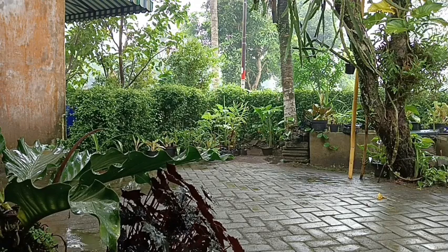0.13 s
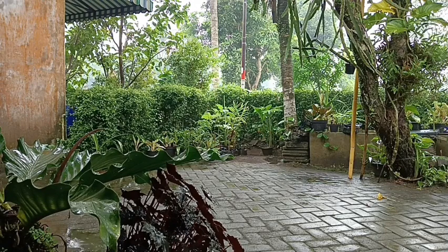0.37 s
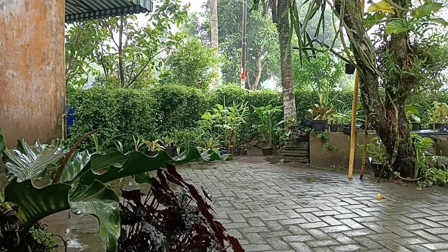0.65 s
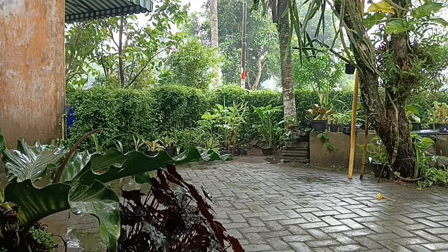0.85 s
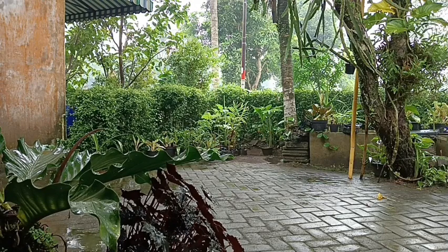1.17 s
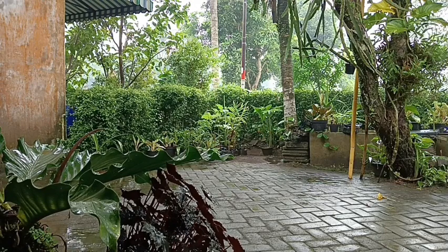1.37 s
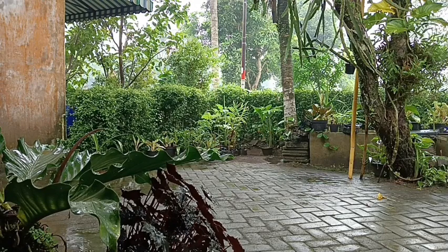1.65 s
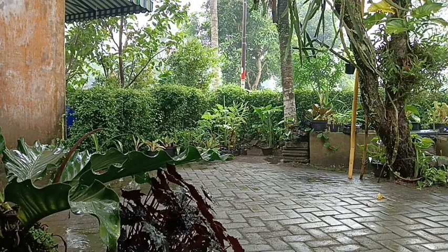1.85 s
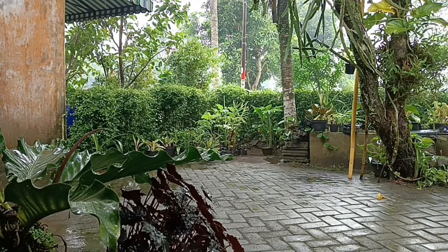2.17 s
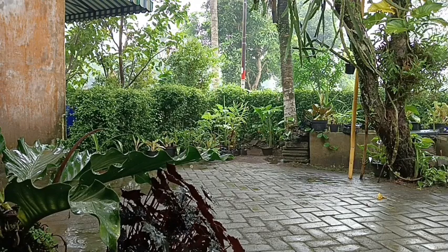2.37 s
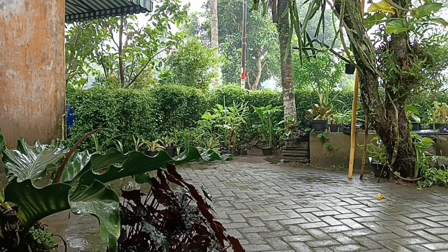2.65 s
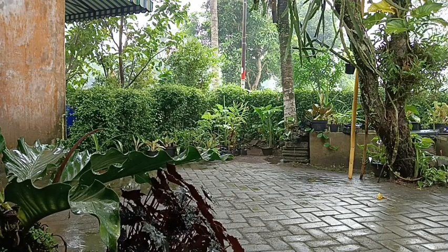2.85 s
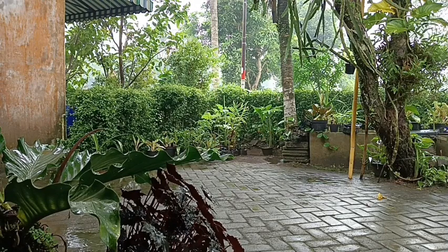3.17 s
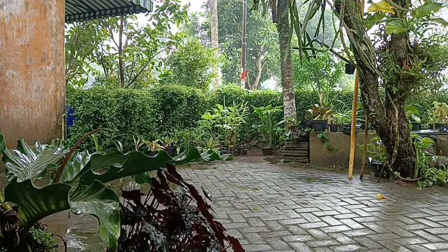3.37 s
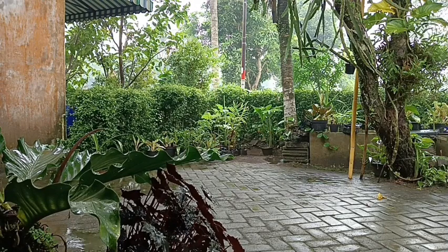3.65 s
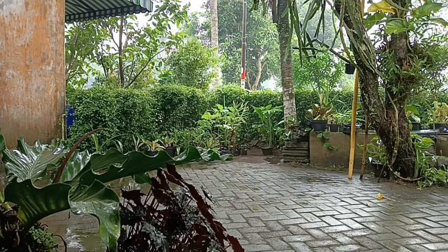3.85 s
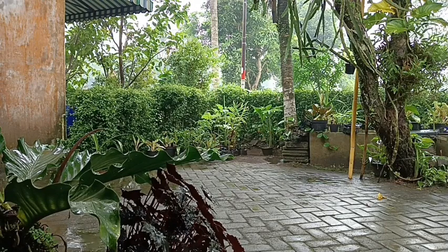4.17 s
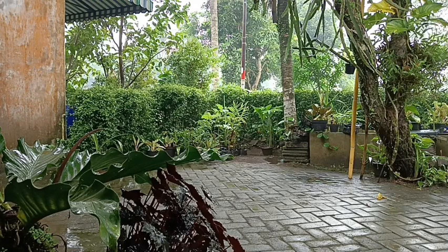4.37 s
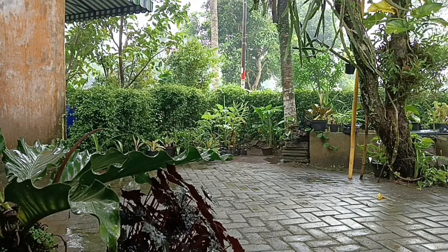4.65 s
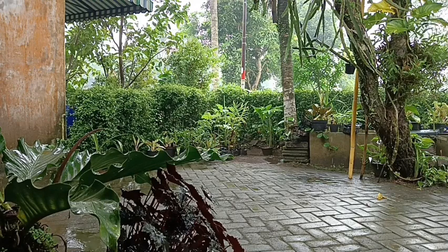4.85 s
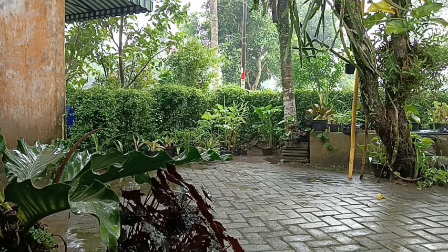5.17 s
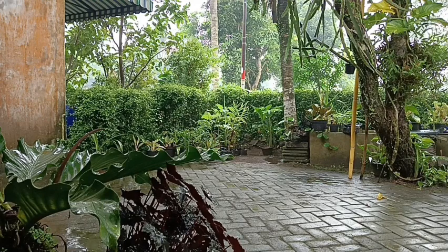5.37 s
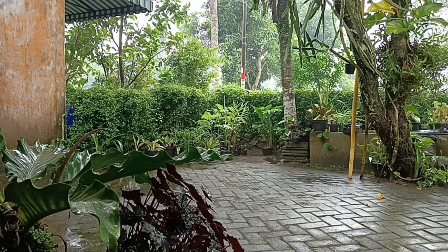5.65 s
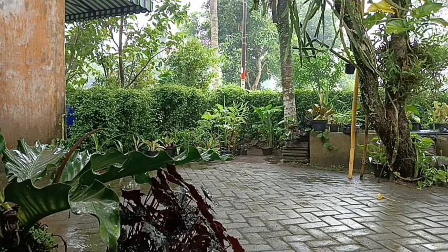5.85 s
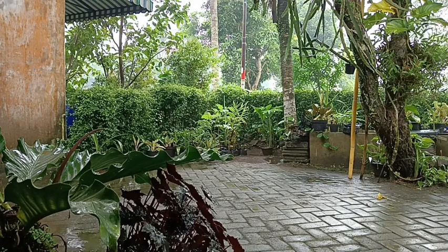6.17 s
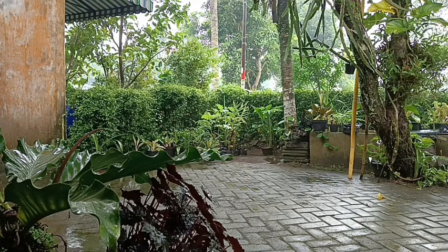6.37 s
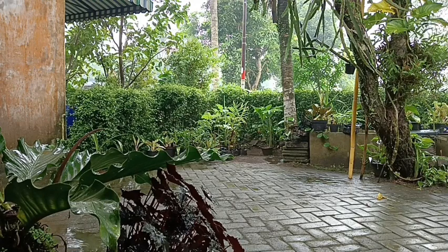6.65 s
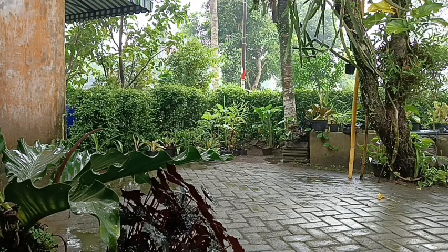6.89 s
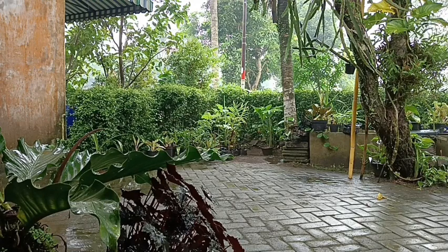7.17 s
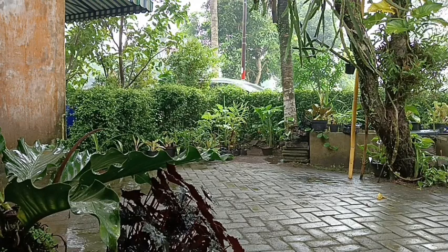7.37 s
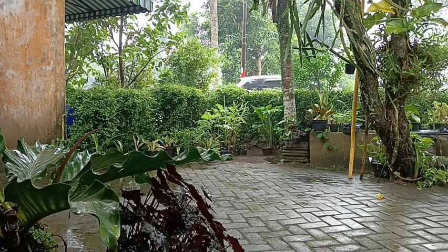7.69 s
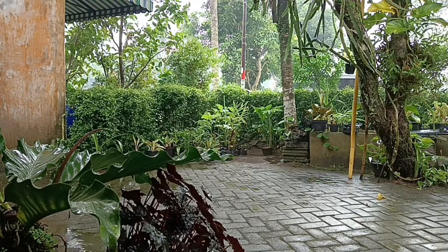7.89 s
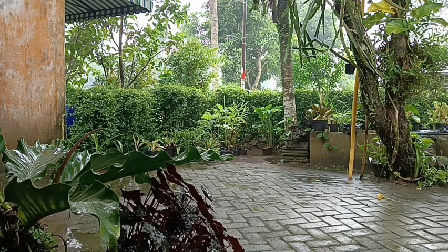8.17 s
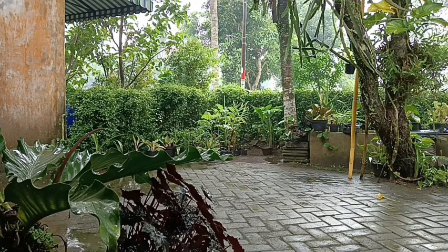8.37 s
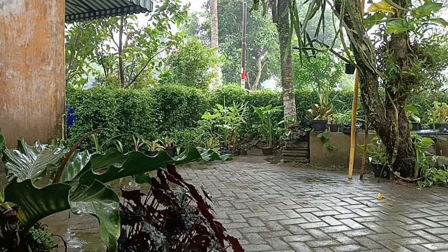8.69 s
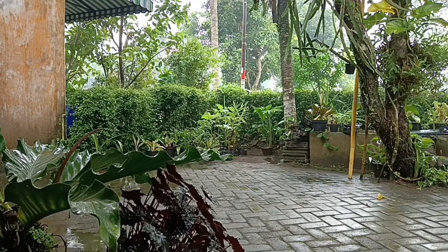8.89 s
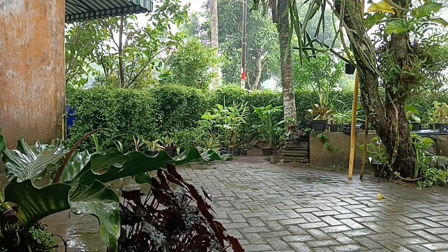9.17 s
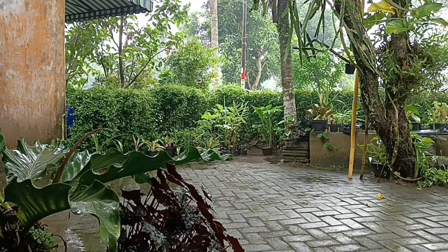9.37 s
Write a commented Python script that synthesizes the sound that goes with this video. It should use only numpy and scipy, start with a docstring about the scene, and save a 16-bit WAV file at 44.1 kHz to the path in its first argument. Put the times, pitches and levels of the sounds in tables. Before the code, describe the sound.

Steady soft rain with hoarse and gliding bird calls; later a car swells up behind a hedge, wet tyres hissing, then growing duller.

```python
"""Light rain on a leafy garden, heard from under a porch roof, is filtered noise with random ticks throughout.
Birds call from the wet trees from the start: hoarse, then also whistled, gliding tones with blurred pitch. Soon
drops shaken from a branch burst on the leaves as fading bright noise, and from 1.5 s heavy drips thud. From
about 4 s a car comes out of faint distant traffic on the wet road behind the hedge. It is made of noise bands
and two blurred engine notes, and its tyre hiss peaks near 8 s, then grows duller."""
import sys
import numpy as np
from scipy import signal
from scipy.fft import rfft, irfft, next_fast_len
from scipy.io import wavfile
from scipy.ndimage import uniform_filter1d, map_coordinates

SR = 44100
rng = np.random.default_rng(int(sys.argv[2]) if len(sys.argv) > 2 else 0)


def bounce(signal):
    """Save signal as a 16-bit WAV file at the path given by the first command-line argument."""
    frames = np.transpose(np.atleast_2d(signal))
    limited = np.clip(frames, -1, 1)
    pcm = np.round(limited * 32767).astype(np.int16)
    wavfile.write(sys.argv[1], SR, pcm)


N = 420273  # length of the scene in samples

# How hard it rains. Each row: time in seconds, level in dB before the quick flurries.
RAIN_LEVEL = [(0, -46.5), (1.7, -48), (2.7, -49.5), (3.1, -46), (5.9, -47.5), (9.53, -52)]
# Tone colour of rain, also the base for the splashes. Each row: frequency in Hz, strength in dB per Hz.
RAIN_SPECTRUM = [(180, -16), (300, -9), (700, -7.5), (1150, -18), (1350, -2), (1910, 2.5), (3070, 3),
                 (4350, -8.5), (5300, 1.5), (8700, -8), (11700, 2.5), (15500, -11)]
# How alike the two ears' noise is. Each row: frequency in Hz, likeness from 0 to 1 (some sounds set a minimum).
EAR_LIKENESS = [(60, 1), (200, 0.91), (330, 0.86), (520, 0.014)]

# Hoarse calls, one row per strand. Each row: start in seconds, swell in seconds, hold in seconds, first pitch
# in Hz, settled pitch in Hz, peak level in dB before rasp and flutter, blur in Hz (of the first partial).
HOARSE_CALLS = [ (0, 0.00035, 0.0038, 3410, 3350, -30.5, 1803), (.125, 0.027, 0.17, 4010, 3534, -44.5, 400),
                (.142, .02, 0.079, 4540, 4310, -44, 810), (.172, 0.017, 0.056, 2715, 2986, -41.5, 506),
                (.195, 0.014, 0.03, 1430, 1463, -54.5, 302), (.333, 0.02, 0.094, 2620, 2544, -45, 401),
                (.44, 0.0081, 0.039, 2785, 2500, -40, 607), (.34, 0.04, 0.12, 4374, 3990, -39.5, 3010),
                (.68, 0.0067, 0.12, 2102, 2030, -43.5, 449), (.69, 0.01, 0.042, 3980, 3720, -47.5, 467),
                (.77, 0.008, 0.022, 1610, 1573, -52.5, 150), (1.05, 0.01, 0.068, 2566, 2646, -48.5, 688),
                (1.1, 0.0063, 0.038, 3360, 3300, -47, 452), (1.172, .026, .003, 3880, 2860, -37.5, 250),
                (1.2, 0.025, 0.052, 3046, 3267, -31.5, 563), (2.18, 0.04, 0.018, 5190, 6030, -47.5, 2000),
                (3.222, 0.01, 0.074, 5040, 4130, -43, 2170), (3.205, 0.0082, 0.052, 2550, 2444, -39, 182),
                (3.232, 0.035, 0.073, 2320, 2128, -31, 149), (5.252, 0.039, 0.02, 3104, 3310, -30.5, 300),
                (3.31, 0.018, 0.056, 1988, 1540, -47.5, 301), (4.86, 0.048, 0.035, 4190, 3555, -38.5, 448),
                (5.155, 0.0056, 0.014, 2950, 2750, -34, 1103), (5.14, 0.058, 0.032, 3336, 3900, -32, 500),
                (5.246, .004, 0.046, 3780, 3677, -30.5, 547), (5.21, 0.023, 0.027, 4160, 4400, -39, 400),
                (5.49, 0.041, 0.13, 2580, 2788, -34.5, 790), (6.612, 0.027, 0.22, 3128, 3450, -38.5, 1503),
                (6.69, 0.039, 0.12, 3730, 4420, -40.5, 650)]
# How every hoarse strand moves. In order: swell in dB, fade in dB per second, glide time in seconds.
HOARSE_MOTION = (4.2, 350, .04)
# Clear whistled notes. Each row: start in seconds, swell in seconds, hold in seconds, first pitch in Hz,
# settled pitch in Hz, peak level in dB before flutter, blur in Hz (of the first partial).
WHISTLED_NOTES = [ (.76, 0.027, 0.038, 2540, 2580, -45.5, 243), (1.203, 0.005, 0.094, 2740, 2717, -44, 229),
                  (2.46, 0.0085, 0.013, 2670, 2605, -47, 493),
                  (2.895, 0.031, 0.057, 3705, 4010, -34.5, 171),
                  (2.96, 0.022, 0.13, 4256, 4187, -32.5, 298.5),
                  (3.125, 0.028, 0.057, 4160, 4084, -34, 171), (4.4, 0.11, 0.056, 3380, 3541, -23.5, 197),
                  (4.92, 0.072, 0.073, 3503, 3540, -29, 204.6), (5.57, 0.044, 0.024, 2840, 2860, -39, 295),
                  (6.275, 0.011, 0.048, 2155, 2157, -47.5, 198)]
# How every whistle moves. In order: swell in dB, fade in dB per second, glide time in seconds.
WHISTLE_MOTION = (15.7, 250, 0.046)
WHISTLE_OVERTONES_DB, HOARSE_OVERTONES_DB = (-26.5, -16.5), (-18.5,)  # relative to the first partial
FADE_END_DB = 35  # a note stops once it has faded this far

# Drops shaken from a branch. Each row: start in seconds, peak level in dB (the average starts 9.5 dB
# lower), time in seconds to fade by 60 dB.
LEAF_SPLASHES = [(0.3262, -31, 0.3), (1.0914, -35, 0.76), (5.1557, -31, 0.88), (6.12, -34, .3)]
# Heavy drips nearby. Each row: start in seconds, level in dB, centre in Hz, time in seconds to fall to
# half strength, splatter from 0 to 1.
HEAVY_DRIPS = [(1.553, -54.5, 765, 0.04, 0.2), (1.804, -53, 613, 0.04, 0.5),
               (2.126, -54.5, 736, 0.12, 0.25), (2.178, -58, 463, .11, 0.05),
               (5.248, -48.5, 670, 0.035, 0.9), (5.25, -55, 270, 0.056, 0), (5.401, -45, 630, 0.041, 0.33),
               (5.815, -54.5, 736, 0.055, 0), (6.132, -56, 810, 0.096, 0.07),
               (7.124, -39, 1122, 0.029, 0.12)]

# The car. Each row: time in seconds, nearness as tyre hiss in dB before lingering and wavering, engine load
# as drone in dB before the throb, engine note in Hz, note level in dB before the throb.
CAR_PATH = [(0, -76.5, -77, 161.6, -90), (4.2, -54.5, -77.5, 161.5, -78.5), (5, -45, -70.5, 159, -66),
            (5.7, -44.5, -77, 159, -61.5), (6.08, -45, -73, 162, -71.5), (6.22, -43.5, -59, 163, -57),
            (6.9, -37, -52, 167.2, -47.5), (7.3, -33, -49, 170.9, -52), (7.8, -32, -51.5, 172.7, -55),
            (8.2, -32.5, -46.5, 191.1, -55), (8.8, -33, -41.5, 212, -47.5),
            (9.53, -35.5, -43, 232.2, -53.5)]
# Low boom of the car. Each row: frequency in Hz, strength in dB per Hz.
BOOM_SPECTRUM = [(50, -45), (72, -9.5), (95, -9), (130, -19.5), (200, -67)]
# Engine drone. Each row: frequency in Hz, strength in dB per Hz.
DRONE_SPECTRUM = [(90, -36), (130, -3.5), (320, -4), (390, -15), (600, -72)]
# Road roar. Each row: frequency in Hz, strength in dB per Hz.
ROAR_SPECTRUM = [(300, -79), (430, 6), (1100, 6.5), (2000, -68)]
# Tyres drawing near, brighter. Each row: frequency in Hz, strength in dB per Hz.
COMING_SPECTRUM = [(650, -103), (1100, -8), (2410, 5), (5360, -5), (8160, -23), (11800, -11.5),
                   (15500, -36)]
# Tyres moving off, duller. Each row: frequency in Hz, strength in dB per Hz.
GOING_SPECTRUM = [(650, -20), (1100, -4.5), (2090, 2.5), (6320, -14.5), (8160, -30), (11100, -13),
                  (15500, -27)]
FAR_BOOM_DB, FAR_DRONE_DB, FAR_ROAR_DB = -76, -91, -73  # distant traffic under it all
BOOM_DB, BOOM_GROWS, SPRAY_DB = -15, 1.054, -7  # boom and fine spray follow nearness
ROAR_DB, ROAR_GROWS = 30, 1.66  # roar follows engine load
# A second engine note joins as the pitch rises: it is weaker by this slope below this pitch of the first.
UPPER_RATIO, UPPER_FROM_HZ, UPPER_DB_PER_HZ = 1.45, 212, 1
NOTE_BLUR_HZ, LINGER_DB = 29.94, 3  # the hiss lingers behind the car
LEFT_LEAD_S = 0.000472  # roar and hiss reach the left this much earlier once the car has passed

# Balance of the two microphones. Each row: frequency in Hz, left over right in dB.
LEFT_OVER_RIGHT = [(5000, 0), (8000, -2), (10500, 9.5), (15000, 2)]
TOP_HZ = 15600  # nothing is heard from here up


def amp(db):
    """Turn decibels into a plain multiplier."""
    return 10 ** (np.asarray(db) / 20)


def unit(x):
    """Scale to an average strength (rms) of 1."""
    return x / np.sqrt(np.mean(np.abs(x) ** 2) + 1e-20)


def along(points, hz):
    """Read a curve of (Hz, value) points on a log frequency axis."""
    f, v = np.transpose(points)
    return np.interp(np.log(hz + 1), np.log(f + 1), v)


def curves(rows, t):
    """Read each column after the time column at times t."""
    times, *columns = np.transpose(rows)
    return [np.interp(t, times, column) for column in columns]


def wobble(knots):
    """A smooth random curve read at rising positions, with one random value per whole step."""
    return map_coordinates(rng.standard_normal(4096), [knots])


def filtered(x, response):
    """Shape the frequencies of x by a function of Hz."""
    padded = next_fast_len(N + 8192)
    hz = np.fft.rfftfreq(padded, 1 / SR)
    return irfft(rfft(x, padded) * response(hz), padded)[..., :N]


def patchy(x, depth_db, bins, frames):
    """Random gain over small patches of time and frequency makes a sound less even."""
    z = signal.stft(x, nperseg=512)[2]
    field = rng.standard_normal(z.shape[1:])
    field = uniform_filter1d(field, size=bins, axis=0)
    field = uniform_filter1d(field, size=frames, axis=1)
    return signal.istft(z * amp(depth_db * unit(field)), nperseg=512)[1][:, :N]


def rush(source, spectrum, patchy_db, direct=0):
    """Colour two streams into stereo of rms 1; direct is the least likeness between the ears."""
    pair = patchy(source, patchy_db, bins=5, frames=9)

    def mid_side(hz):
        turn = np.arccos(np.clip(along(EAR_LIKENESS, hz), direct, 1)) / 2
        return amp(along(spectrum, hz)) * np.array([np.cos(turn), np.sin(turn)])

    mid, side = filtered(pair, mid_side)
    return unit(np.array([mid + side, mid - side]))


def rain():
    """Countless far drops merge into hiss; nearer ones tick on the leaves at scattered strengths."""
    t = np.arange(N) / SR
    noise, pick = rng.standard_normal((2, N)), rng.random((2, N))
    size = rng.exponential(size=(2, N))
    # about 1500 ticks a second in each stream
    ticks = unit((pick < 1500 / SR) * np.sign(noise) * amp(4.2 * np.minimum(size, 5)))
    flurries = amp(0.8 * wobble(9 * t) + 1.3 * wobble(24 * t))
    falling = amp(curves(RAIN_LEVEL, t)[0])
    spray = amp(curves(CAR_PATH, t)[0] + SPRAY_DB)  # the car throws up spray
    return np.hypot(falling, spray) * flurries * rush(noise + 0.5 * ticks, RAIN_SPECTRUM, patchy_db=1.4)


def sing(rows, motion, overtones_db):
    """Every note swells, holds and fades, while its pitch slides to where it settles."""
    swell_db, fade_db, glide = motion
    for start, swell, hold, first_hz, settled_hz, peak_db, blur_hz in rows:
        t = np.arange(0, swell + hold + FADE_END_DB / fade_db, 1 / SR)
        rise_db = swell_db * np.clip(1 - t / swell, 0, 1)
        fall_db = fade_db * np.maximum(t - swell - hold, 0)
        hz = settled_hz + (first_hz - settled_hz) * np.exp(-t / glide)
        yield start, hz, peak_db - rise_db - fall_db, blur_hz, overtones_db


def scatter(knots):
    """Random strength and phase: a narrow core inside a wider, weaker halo."""
    core, halo = (wobble(pace * knots) + 1j * wobble(pace * knots) for pace in (0.6, 1.45))
    return unit(core + 0.82 * halo)


def flutter(notes, alike):
    """Partials flutter in strength and phase, which blurs pitch; alike is the share common to both ears."""
    out = np.zeros((2, N + SR))
    for start, hz, db, blur_hz, overtones_db in notes:
        t = np.arange(len(hz)) / SR
        # a quick fade-in, skipped for notes that start with the scene
        edge = np.clip((t + (start < 0.01)) / 0.0068, 0, 1)
        for k, part_db in enumerate((0, *overtones_db), 1):
            both, *own = [scatter(blur_hz * k ** 0.7 * t) for path in range(3)]
            mix = np.sqrt(alike) * both + np.sqrt(1 - alike) * np.array(own)
            tone = np.exp(2j * np.pi * k * np.cumsum(hz) / SR)
            shape = amp(db + part_db) * edge
            # the flutter keeps the note's energy
            power = np.sum(np.abs(mix * shape) ** 2, axis=1, keepdims=True) / np.sum(shape ** 2)
            sound = np.sqrt(2 / power) * shape * np.real(mix * tone)
            out[:, round(start * SR):][:, :len(t)] += sound
    return out[:, :N]


def birds():
    """Each call is smeared, differently for each ear, and hoarse calls break into strands."""
    t = np.arange(N) / SR
    rasp = unit(amp(1.5 * np.clip(wobble(300 * t), -2, 1.5)))  # uneven strokes of the throat
    strands = flutter(sing(HOARSE_CALLS, HOARSE_MOTION, HOARSE_OVERTONES_DB), alike=0)
    hoarse = patchy(strands, depth_db=2.5, bins=2, frames=16)
    whistles = flutter(sing(WHISTLED_NOTES, WHISTLE_MOTION, WHISTLE_OVERTONES_DB), alike=0)
    return whistles + rasp * hoarse


def garden(x):
    """Trunks, walls and paving scatter a short tail, made of noise that fades by 60 dB in 0.49 s."""
    t = np.arange(SR // 2) / SR
    tail = rng.standard_normal((2, len(t))) * amp(-60 * t / 0.49)
    return signal.fftconvolve(x, tail / np.linalg.norm(tail[0]), axes=1)[:, :N]


def splashes():
    """Drops bursting on leaves give bright noise that starts at once and dies away."""
    level, t = np.zeros(N + SR), np.arange(SR // 2) / SR
    for start, peak_db, fade_s in LEAF_SPLASHES:
        # mean strength lies under the peak
        level[round(start * SR):][:len(t)] += amp(peak_db - 9.5 - 60 * t / fade_s)
    noise = rng.standard_normal((2, N))
    spray = filtered(noise, lambda hz: amp(along(RAIN_SPECTRUM, hz)) * hz / (hz + 9000))
    return unit(spray) * level[:N]


def thuds():
    """A hollow plop at the pitch of what the drip lands on, with some broad splatter."""
    out, f = np.zeros((2, N + SR)), np.fft.rfftfreq(SR // 2, 1 / SR)
    t = np.arange(SR // 2) / SR
    for start, db, hz, length, splatter in HEAVY_DRIPS:
        body = splatter / (1 + f / 3000) + 1 / (1 + ((f - hz) / 70) ** 2)
        both, *own = rng.standard_normal((3, SR // 2))  # one part shared, one part for each ear
        shape = np.clip(t / 0.0031, 0, 1) / (1 + (t / length) ** 3)
        puff = irfft(rfft(both + np.array(own)) * body) * shape
        level = amp(db) * np.linalg.norm(shape) * np.sqrt(2) / np.linalg.norm(puff)
        out[:, round(start * SR):][:, :len(t)] += level * puff
    return out[:, :N]


def road():
    """A car draws near: boom, drone and notes throb together, then roar and tyres hissing through water."""
    t = np.arange(N) / SR
    near_db, load_db, note_hz, note_db = curves(CAR_PATH, t)
    noise = rng.standard_normal((5, 2, N))

    boom_level = np.hypot(amp(FAR_BOOM_DB), amp(BOOM_DB + BOOM_GROWS * near_db))
    boom = boom_level * rush(noise[0], BOOM_SPECTRUM, patchy_db=1.0)
    drone_level = np.hypot(amp(FAR_DRONE_DB), amp(load_db))
    drone = drone_level * rush(noise[1], DRONE_SPECTRUM, patchy_db=2.5)
    upper_db = UPPER_DB_PER_HZ * np.minimum(note_hz - UPPER_FROM_HZ, 0)
    notes = [(0, note_hz, note_db, NOTE_BLUR_HZ, ()),
             (0, UPPER_RATIO * note_hz, note_db + upper_db, NOTE_BLUR_HZ, ())]
    engines = flutter(notes, alike=0.98)  # low notes reach both ears nearly alike
    throb_depth_db = np.interp(t, (5.8, 6.6), (5.5, 1.2))
    throb = amp(throb_depth_db * np.clip(1.3 * wobble(9 * t), -2.5, 1))

    roar_level = np.hypot(amp(FAR_ROAR_DB), amp(ROAR_DB + ROAR_GROWS * load_db))
    roar = roar_level * rush(noise[2], ROAR_SPECTRUM, patchy_db=2.55, direct=0.31)
    past = np.clip((t - 7.4) / 2.0, 0, 1)  # the hiss turns duller as the car goes by
    coming = np.sqrt(1 - past) * rush(noise[3], COMING_SPECTRUM, patchy_db=2.0)
    going = np.sqrt(past) * rush(noise[4], GOING_SPECTRUM, patchy_db=1.5, direct=0.27)
    hiss = amp(near_db + LINGER_DB * past ** 2 + 0.24 * wobble(5 * t)) * (coming + going)
    left, right = roar + hiss
    right_delay = LEFT_LEAD_S * np.clip(2 * past, 0, 1)  # it has moved to one side
    right = map_coordinates(right, [(t - right_delay) * SR])
    # the drone throbs half as deeply in dB
    return throb * (boom + engines) + np.sqrt(throb) * drone + np.array([left, right])


def scene():
    """Add all the sounds; only the bird calls get the garden's tail."""
    calls = birds()
    echoes = amp(-0.5) * garden(calls)
    return rain() + calls + echoes + splashes() + thuds() + road()


def record(dry):
    """Two microphones differ in the treble, the left stronger at the top; a band limit cuts the rest."""
    def microphones(hz):
        return amp(np.outer([0.5, -0.5], along(LEFT_OVER_RIGHT, hz))) * (hz < TOP_HZ)

    return filtered(dry, microphones)


dry = scene()
out = record(dry)
bounce(out)
```